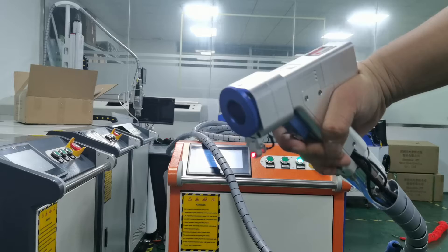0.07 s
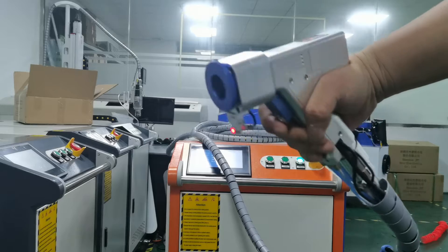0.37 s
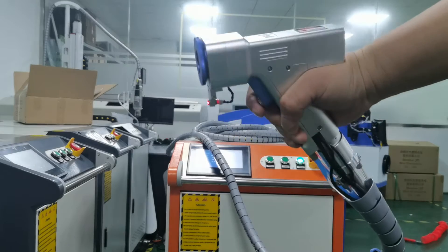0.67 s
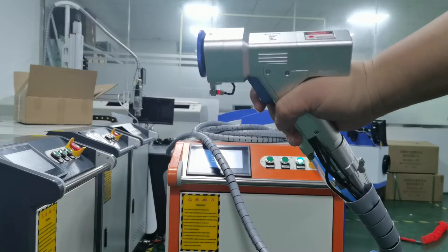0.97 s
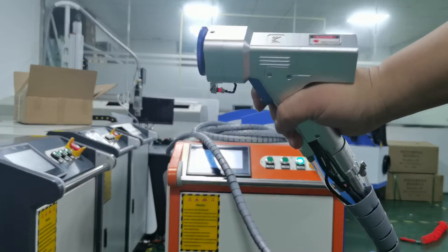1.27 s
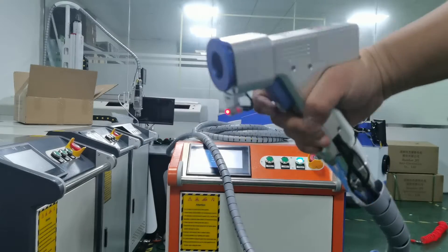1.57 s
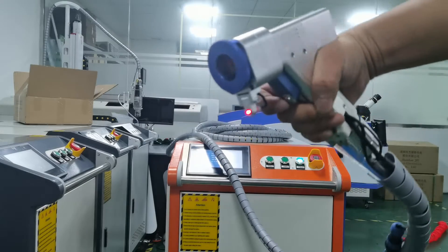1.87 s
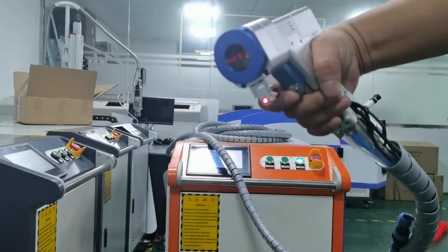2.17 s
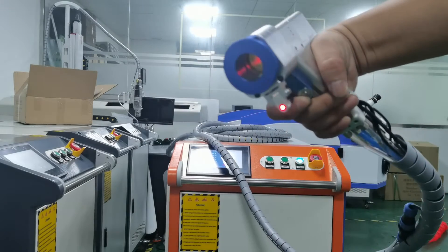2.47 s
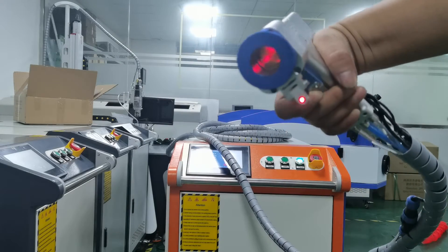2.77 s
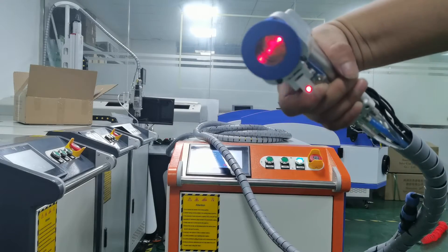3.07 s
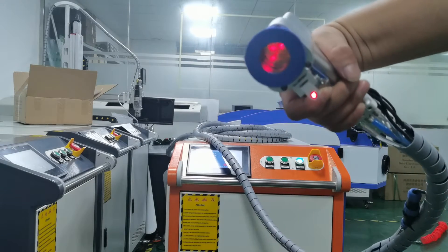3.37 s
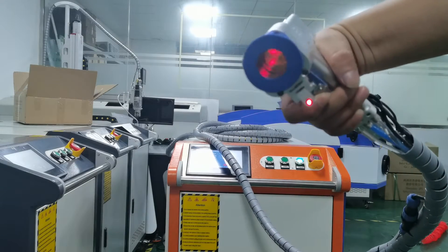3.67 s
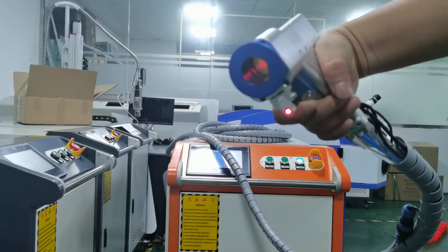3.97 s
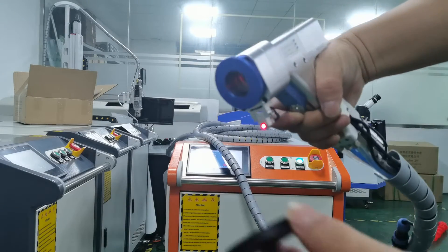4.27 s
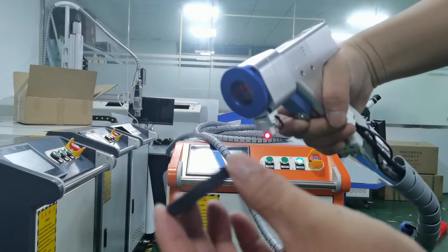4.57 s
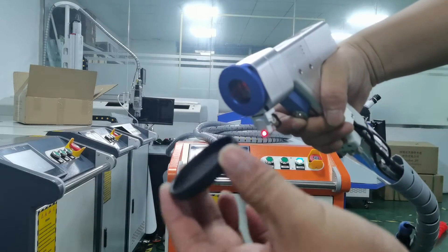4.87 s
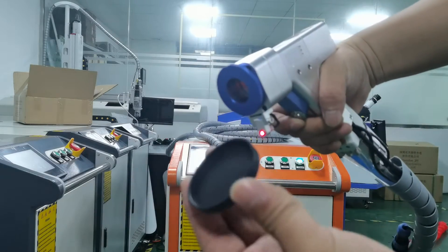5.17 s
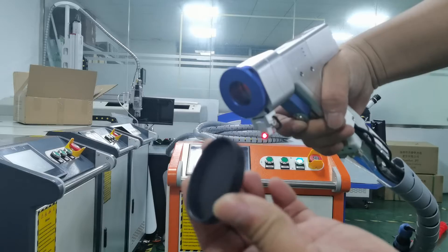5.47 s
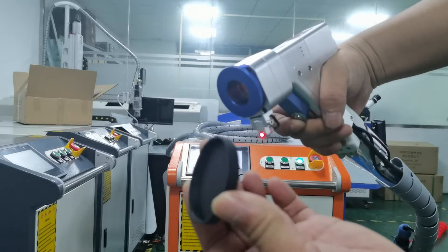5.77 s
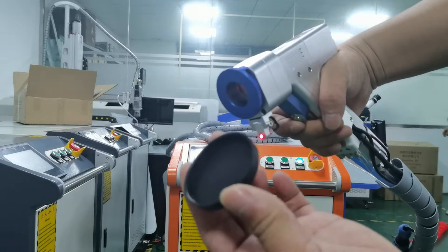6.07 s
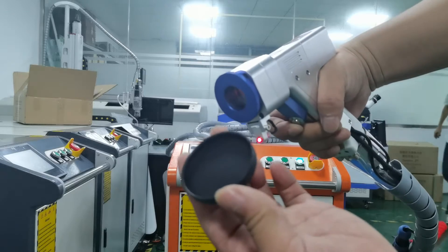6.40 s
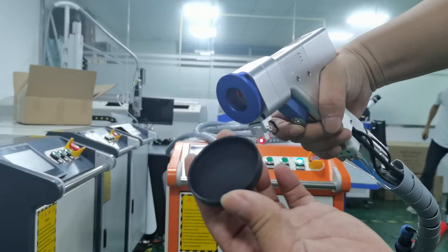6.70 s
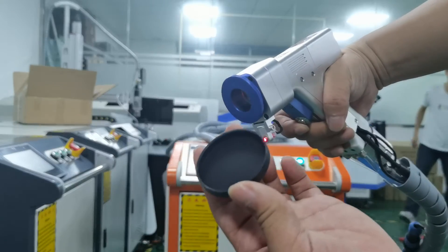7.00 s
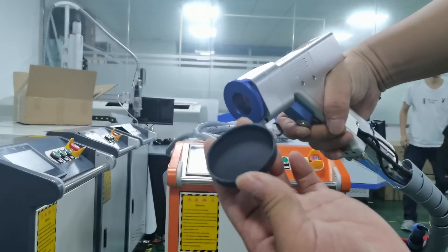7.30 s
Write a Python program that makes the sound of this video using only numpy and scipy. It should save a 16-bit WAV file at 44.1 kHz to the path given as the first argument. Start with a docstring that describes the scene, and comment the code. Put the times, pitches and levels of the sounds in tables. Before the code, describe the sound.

A machine cabinet hums steadily in a workshop with short wall reflections. Close to the microphone, the heavy hose of a handheld cleaning gun slides with uneven scrapes and soft low bumps, then gives small ticks while air seeps faintly. A little past halfway, gas bursts sharply from the nozzle and keeps hissing to the end, with a light buzz from the gun and more hose rumble underneath.

```python
"""First you hear a wrapped hose dragging and rumbling over the hum of a machine cabinet, as a hand-held
laser cleaning gun is turned about in a hard-walled workshop. The hose scuffs now and then, and a little
air leaks from the nozzle. At about 4.5 s the gas valve opens: a sharp spurt settles into a steady hiss,
and the mirror that sweeps the laser beam starts to buzz."""
import sys
import numpy as np
from scipy import signal
from scipy.fft import rfft, irfft
from scipy.io import wavfile

SR = 44100
rng = np.random.default_rng(int(sys.argv[2]) if len(sys.argv) > 2 else 0)


def to_wav(sig):
    """Store sig (one row per channel, or 1-D mono) as 16-bit WAV at the path in sys.argv[1].

    Samples outside -1..1 are clipped; the rate is SR.
    """
    pcm = np.clip(np.atleast_2d(sig), -1, 1) * 32767
    pcm = np.round(pcm).astype(np.int16)
    wavfile.write(sys.argv[1], SR, pcm.T)  # frames by channels


N = 328104
T = np.arange(N) / SR  # time of each sample [s]
F = np.maximum(np.fft.rfftfreq(N, 1 / SR), 1)  # frequencies [Hz]
START_S, VALVE_S, JET_S = .408, 4.4985, 4.509  # sound begins; valve cracks open; jet leaves the nozzle
OPPOSITE = np.array([[1], [-1]])  # plus on the left, minus on the right


def undb(db):
    """Turn decibels into a gain to multiply by."""
    return 10 ** (np.asarray(db) / 20)


def curve(rows, column=1):
    """Join one column of a table with straight lines in time."""
    rows = np.array(rows)
    return np.interp(T, rows[:, 0], rows[:, column])


def colour(rows, column=1):
    """A tone colour: the gain at every frequency, drawn through (Hz, dB) points."""
    rows = np.array(rows)
    return undb(np.interp(np.log(F), np.log(rows[:, 0]), rows[:, column]))


def resonances(rows):
    """A colour with narrow peaks where something rings."""
    return undb(sum(db / (1 + (2 * (F - hz) / width_hz) ** 2) for hz, width_hz, db in rows))


def normal(gain):
    """Scale a colour so that its noise has an average (rms) size of 1."""
    return gain / np.sqrt(np.mean(gain ** 2) * SR / 2)


def shape(x, gain):
    """Filter a sound with a colour."""
    return irfft(rfft(x) * gain, N)


def noise(gain):
    """Rushing noise of the given colour."""
    return shape(rng.standard_normal(N), gain) * np.sqrt(SR / 2)


def unit(x):
    """Scale a signal to an average (rms) size of 1."""
    return x / np.std(x)


def wander(rate_hz):
    """A smooth random wobble of size 1."""
    return unit(noise(np.exp(-(F / rate_hz) ** 2)))


def swell(at, rise, decay=np.inf):
    """A push that builds up, then dies away if given a decay time."""
    age = np.maximum(T - at, 0)
    return (1 - np.exp(-age / rise)) * np.exp(-age / decay)


def room_noise(gain, push, direct_db, t60, right_db=0):
    """Noise that follows a push; the share bouncing off the walls fades by 60 dB in t60 seconds."""
    keep = np.exp(-2 * np.log(1000) / (t60 * SR))
    lingering = np.sqrt(signal.lfilter([1 - keep], [1, -keep], push ** 2))
    # low notes reach both sides alike; high ones arrive from all the walls
    wall_share = 1 / (1 + undb(direct_db) ** 2) / (1 + (380 / F) ** 4)
    direct = noise(gain * np.sqrt(1 - wall_share)) * push * undb(-right_db * OPPOSITE)
    return direct + np.array([noise(gain * np.sqrt(wall_share)) for side in range(2)]) * lingering


def tone(hz, db, waver_db):
    """A wavering machine note; high notes reach the two sides out of step."""
    lag = rng.standard_normal() * min(hz / 1100, 1) * OPPOSITE
    phase = 2 * np.pi * (hz * T + rng.random()) + 0.035 * waver_db * wander(3.9)
    return np.sqrt(2) * undb(db + waver_db * wander(5.1)) * np.sin(phase + lag)


# whoosh of the cooling fans: (frequency [Hz], level [dB])
FAN_COLOUR = [(15, -98), (33, -72), (80, -79.5), (240, -71), (350, -77), (560, -85), (820, -82.5),
              (1100, -87), (1400, -95.5), (2000, -95), (2900, -100), (5000, -106), (7000, -114),
              (15800, -116)]
# notes of the transformer and motors: (pitch [Hz], level [dB], waver [dB])
HUM_NOTES = [(99.9, -47, 2.5), (122.2, -61, 2.5), (199.95, -36.5, 0.84), (233.2, -47.5, 1.2),
             (282.5, -51, -0.5), (300.7, -50, 1.5), (326.4, -60.5, 1), (400, -69.5, 1.5)]
def cabinet():
    """Fans blow and mains power hums; the hum is a little quieter while the jet runs."""
    spread = 1 / (1 + (520 / F) ** 2) / 2  # the bass stays in the middle
    middle = noise(colour(FAN_COLOUR) * np.sqrt(1 - spread))
    sides = noise(colour(FAN_COLOUR) * np.sqrt(spread))
    fans = (middle + sides * OPPOSITE) * undb(0.89 * wander(11))
    hum_gain = undb(0.8 - 1.5 * swell(JET_S, 0.041))
    return fans + hum_gain * sum(tone(*row) for row in HUM_NOTES)


# notes of the pump: (multiple of the shaft rate, level [dB])
PUMP_NOTES = [(15, -68), (17, -67), (19, -66), (31, -76), (33, -74), (35, -77), (37, -77), (39, -77),
              (41, -76)]
def pump(shaft_hz=49.6):
    """The cooling pump whines faintly at odd multiples of its turning rate."""
    return sum(tone(shaft_hz * k, db, waver_db=1.7) for k, db in PUMP_NOTES)


# rumble of the hose: (frequency [Hz], level [dB])
RUMBLE_COLOUR = [(12, -89), (32, -51), (65, -49.5), (130, -62), (260, -63), (450, -68), (900, -100)]
# swings of the hose: (middle time [s], half length [s], rumble [dB], bump [dB])
HOSE_SWINGS = [(.45, 0.16, -41.5, -60), (0.748, 0.2, -39.5, -43.5), (1.752, 0.18, -39.5, -43),
               (3.278, 0.19, -40, -41), (4.856, 0.37, -41.5, -42.5), (5.4, .2, -38, -39),
               (5.757, .14, -40.5, -42)]
def swings(resting_db=-51.5):
    """The heavy hose rumbles softly when held; each swing swells the rumble and adds a soft bump."""
    rumble_power, bump_power = undb(resting_db) ** 2, 0
    for at, half_s, rumble_db, bump_db in HOSE_SWINGS:
        bell = np.exp(-2 * ((T - at) / half_s) ** 2)
        rumble_power += bell * undb(rumble_db) ** 2
        bump_power += bell * undb(bump_db) ** 2
    deep = colour(RUMBLE_COLOUR)
    rumble = unit(noise(deep)) + undb(-17.5) * unit(noise(deep)) * OPPOSITE
    bump = unit(noise(1 / np.sqrt((1 + (105 / F) ** 8) * (1 + (F / 140) ** 8))))
    return rumble * np.sqrt(rumble_power) + bump * np.sqrt(bump_power)


# pulls on the hose: (start [s], rise [s], hold [s], sliding speed [dB], brightness [dB])
HOSE_PULLS = [(0.383, 0.059, 0.11, -1, 4.5), (0.603, 0.049, 0.016, 1.5, -4.5),
              (0.83, 0.026, 0.075, -18, -9), (1.177, 0.084, 0.04, -12.5, 0),
              (1.326, 0.018, 0.28, -21.5, 16.5), (1.485, .025, .04, -13, 9), (1.537, .05, .03, -10.5, -12),
              (1.704, 0.029, .02, -14, -9), (3.083, 0.037, .08, -22, -20),
              (3.583, 0.037, 0.041, -21.5, -31)]
def friction(db, exponent, bright_share=0, slowing_db_per_s=67):
    """Strength of a rubbing noise: it follows the hose as each pull speeds up, holds and slows."""
    power = 0
    for at, rise, hold, speed_db, bright_db in HOSE_PULLS:
        slowing_db = slowing_db_per_s * np.maximum(T - at - rise - hold, 0)
        speed = np.clip((T - at) / rise, 0, 1) * undb(speed_db - slowing_db)
        power += (speed ** exponent * undb(bright_share * bright_db)) ** 2
    return undb(db) * np.sqrt(power)


# the wrap's drag, and its higher swish: (frequency [Hz], level [dB])
DRAG_COLOUR = [(200, -89), (600, -80.5), (1200, -73), (2100, -68.5), (3500, -71.5), (4600, -74.5),
               (6500, -84), (12000, -105)]
SWISH_COLOUR = [(2000, -100), (5000, -89), (7000, -78), (8300, -73.5), (10000, -79), (13000, -84),
                (15800, -91)]
# hollow ring of the hose sleeve: (frequency [Hz], width [Hz], boost [dB])
SLEEVE_PEAKS = [(557, 160, 6.5), (1020, 220, 6), (2090, 380, 2.5), (2730, 240, 3), (3600, 440, 4)]
def hose(echo_s=.00146, drift_s=.00012):
    """The wrapped hose drags with an uneven grip; faster sliding sounds brighter."""
    grip = undb(1.25 * wander(21) + 1.7 * wander(400))
    drag, fine = colour(DRAG_COLOUR) * resonances(SLEEVE_PEAKS), colour(SWISH_COLOUR)
    low = 1 / (1 + (F / 1450) ** 8)
    top = 1 / (1 + (10500 / F) ** 12)
    scrape = room_noise(normal(drag * np.sqrt(1 - low)), grip * friction(-36, 1.14, 0.26), -13, t60=.11)
    rub = room_noise(normal(drag * np.sqrt(low)), grip * friction(-45.5, 0.55), -8, t60=.15)
    # an echo off the gun, wavering only slightly, lends the drag a hollow tone
    earlier = T - echo_s - drift_s * wander(2)
    echo = 0.2 * np.array([np.interp(earlier, T, side) for side in scrape + rub])
    swish = room_noise(normal(fine * (1 - top)), grip * friction(-41, 1.34, 0.56), -7.5, t60=.11)
    sizzle = room_noise(normal(fine * top), grip * friction(-41, 1.39, 1), -16, t60=.11)
    return scrape + rub + echo + swish + sizzle


# ring of the plastic wrap: (frequency [Hz], boost [dB])
WRAP_COLOUR = [(800, 11), (1300, 11), (1900, 6.5), (2800, -2), (4000, 5), (5000, -0.5), (7000, -3),
               (8500, 2), (10000, -2.5)]
# scuffs: (time [s], level [dB], tick boost [dB], rise [s], decay [s], low edge [Hz], high edge [Hz])
WRAP_SCUFFS = [(2.14, -78, 5.5, 0.0046, 0.056, 1890, 11300), (2.642, -112, 20, .002, .01, 7040, 15000),
               (3.1, -79.5, -10, 0.01, 0.02, 11500, 11800), (3.573, -76, -7, 0.0096, 0.042, 5740, 10700)]
def scuffs():
    """The wrap catches with a tick, then slides for a moment."""
    out = 0
    grip = undb(2 * wander(250))
    for at, db, tick_db, rise, decay, low_hz, high_hz in WRAP_SCUFFS:
        ring = colour(WRAP_COLOUR) * undb(db) / np.sqrt(1 + (low_hz / F) ** 4)
        slide_colour = ring / np.sqrt(1 + (F / high_hz) ** 8)
        tick_colour = ring / np.sqrt(1 + (F / high_hz / 2) ** 8)
        slide = room_noise(slide_colour, grip * swell(at, rise, decay), direct_db=-10, t60=.4)
        tick = noise(tick_colour) * undb(tick_db - 4) * swell(at, .0002, .0018)
        out += slide + tick
    return out


# hiss of the leak: (frequency [Hz], level [dB])
LEAK_COLOUR = [(1200, -112), (1650, -102), (2000, -89.5), (2400, -102), (3000, -105), (3600, -94.5),
               (4200, -92.5), (5300, -102), (6400, -99), (7500, -112), (8800, -106), (10700, -102),
               (11800, -114), (15800, -120)]
# ring of the nozzle, shared with the gas jet: (frequency [Hz], width [Hz], boost [dB])
NOZZLE_PEAKS = [(556, 140, -0.5), (763, 30, 6), (3250, 150, 1.5), (3950, 100, 2), (4230, 230, 6),
                (4930, 42, 4.5), (5340, 52, 7), (9000, 200, 3), (13900, 300, 4)]
# the leak is louder as the nozzle faces forward: (time [s], body level [dB], treble level [dB])
LEAK_LEVELS = [(1.8, -67, -90), (2.05, -56, -72), (2.5, -63, -89), (3.0, -62.5, -72), (3.35, -60.5, -76),
               (3.8, -60, -66), (4.2, -54.5, -63.5), (4.45, -57, -66.5)]
def leak():
    """A little air seeps through the closed valve; its treble is beamed forward."""
    hiss = colour(LEAK_COLOUR)
    high = 1 / (1 + (5500 / F) ** 8)
    body_colour = normal(hiss * resonances(NOZZLE_PEAKS) * (1 - high))
    body = room_noise(body_colour, undb(curve(LEAK_LEVELS)), direct_db=-29, t60=.3)
    beam = room_noise(normal(hiss * high), undb(curve(LEAK_LEVELS, column=2)), direct_db=-12, t60=.25)
    return body + beam


# buzz of the mirror: (multiple of the sweep rate, level [dB])
MIRROR_NOTES = [(4, -60.5), (6, -51), (8, -50), (10, -54), (11, -48), (12, -54), (14, -49), (15, -50.5),
                (16, -55.5), (17, -60), (19, -57), (20, -61.5), (23, -63), (25, -62), (32, -55.5),
                (33, -57.5), (34, -69), (38, -64), (75, -63), (79, -75)]
def mirror(sweep_hz=24.39):
    """The scanning mirror swings to and fro and shakes the gun's housing."""
    return swell(JET_S, 0.15) * sum(tone(sweep_hz * k, db, waver_db=2.57) for k, db in MIRROR_NOTES)


# the steady jet, the first spurt and the hollow gas line: (frequency [Hz], level [dB])
JET_COLOUR = [(60, -88), (200, -67.5), (380, -74.5), (600, -74), (850, -77), (1250, -84), (2000, -78),
              (3700, -76.5), (5000, -78), (5900, -81), (7000, -78), (9000, -77.5), (12000, -77),
              (15800, -84)]
SPURT_COLOUR = [(150, -83), (380, -74), (540, -57), (750, -67.5), (1250, -64.5), (2000, -62.5),
                (3000, -61.5), (4000, -61), (6000, -65.5), (8000, -63), (10500, -55), (15800, -68)]
GAS_LINE_COLOUR = [(300, -100), (430, -66), (510, -49), (620, -52.5), (760, -70), (1100, -100)]
def gas(settle_s=0.48, hold_s=0.02, empty_s=0.022):
    """The valve cracks open, the stored pressure spurts out, and the jet settles to a steady hiss."""
    nozzle, burst = resonances(NOZZLE_PEAKS), colour(SPURT_COLOUR)
    age = np.maximum(T - JET_S, 0)
    surge_db = 3 * np.exp(-age / settle_s)
    flow = swell(JET_S, .02) * undb(-0.82 + surge_db + 0.9 * wander(13))
    jet = room_noise(colour(JET_COLOUR) * nozzle, flow, direct_db=-19, t60=.25)
    snap = undb(-5) * swell(VALVE_S, .00045, .012)
    crack = room_noise(burst / (1 + (F / 8000) ** 2), snap, direct_db=-8, t60=.27)
    pressure = (T > JET_S) * np.exp(-np.maximum(age - hold_s, 0) / empty_s)
    spurt = undb(2.5 + 2 * wander(300)) * pressure
    high = 1 / (1 + (9000 / F) ** 8)
    body = room_noise(burst * nozzle * (1 - high), undb(-0.5) * spurt, direct_db=-12, t60=.57)
    # the spurt's treble starts hard and is beamed to the right
    front = undb(9) * swell(JET_S, .0001, .0011)
    beam = room_noise(burst * high, spurt + front, direct_db=-8.5, t60=.45, right_db=7)
    # the jump in pressure makes the gas line ring
    ring = room_noise(colour(GAS_LINE_COLOUR), swell(JET_S, .0026, .056), direct_db=-9, t60=.85)
    return jet + crack + body + beam + ring


def scene():
    """Add up everything in the workshop, in stereo."""
    return cabinet() + pump() + hose() + scuffs() + swings() + leak() + gas() + mirror()


def standing_waves(count=700):
    """Wall echoes lift some frequencies and weaken others on each side, most in the midrange."""
    grid = np.linspace(0, SR / 2, count)
    depth_db = 2.8 / (1 + (700 / F) ** 2) / np.sqrt(1 + (F / 6000) ** 2)
    return np.array([undb(depth_db * np.interp(F, grid, rng.standard_normal(count))) for _ in range(2)])


def ring_after(gain):
    """Turn a colour into a filter that rings only after a sound, never before it."""
    cepstrum = irfft(np.log(gain), N)
    forward_only = np.r_[1, np.full(N // 2 - 1, 2), np.zeros(N - N // 2)]
    return np.exp(rfft(cepstrum * forward_only))


def gain_control(x, limit_db=-29, ratio=1.8, memory_s=0.076):
    """Turn the sound down while its recent level is above the limit."""
    keep = np.exp(-1 / (memory_s * SR))
    power = signal.lfilter([1 - keep], [1, -keep], np.mean(x ** 2, axis=0))
    over = np.maximum(np.sqrt(np.abs(power)) / undb(limit_db), 1)
    return x * over ** (1 / ratio - 1)


# colour of the two microphone openings: (frequency [Hz], left [dB], right [dB])
MIC_COLOUR = [(176, -1.03, -1.8), (303, -1.1, -1.6), (594, 0.5, 0), (4700, 0, 1), (7050, 2, -2.5),
              (8030, 1.5, -7), (8830, 7, -3.5), (9410, 7, -2.5), (9600, -10, 5.5), (11300, -9, 1),
              (13400, -5.5, -2.5), (15800, -8, 0.5)]
def record(dry, top_hz=15800):
    """Each side gets its own colour; the sound starts abruptly, loud parts are eased, the top is cut."""
    sides = np.array([colour(MIC_COLOUR), colour(MIC_COLOUR, column=2)]) * standing_waves()
    heard = shape(dry, ring_after(sides)) * swell(START_S, 0.00068)
    treble_cut = signal.ellip(12, .1, 80, top_hz, fs=SR, output="sos")
    return signal.sosfilt(treble_cut, gain_control(heard))


dry = scene()
out = record(dry)
to_wav(out)
```